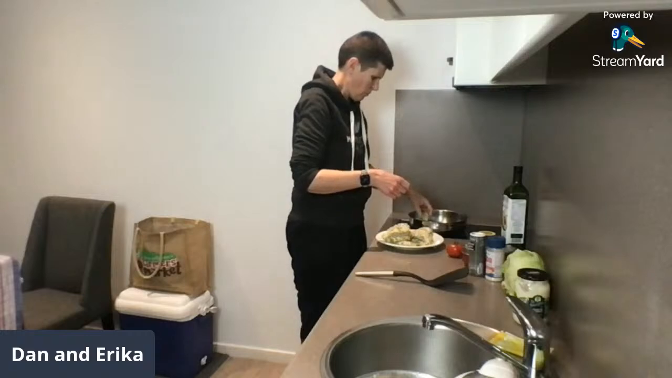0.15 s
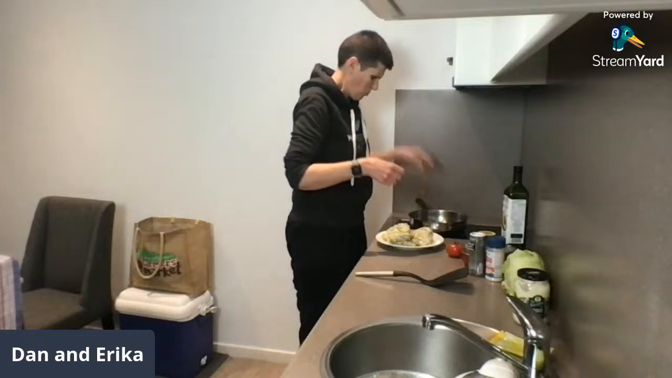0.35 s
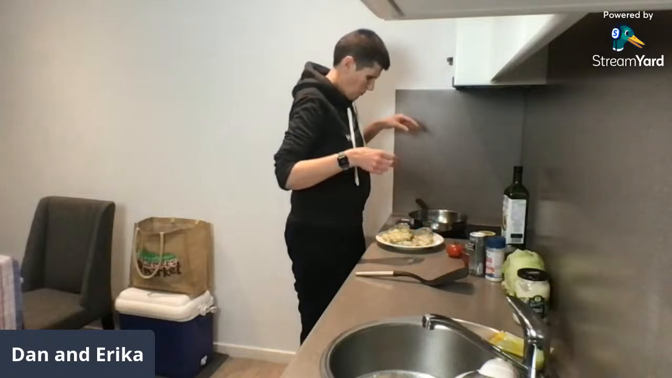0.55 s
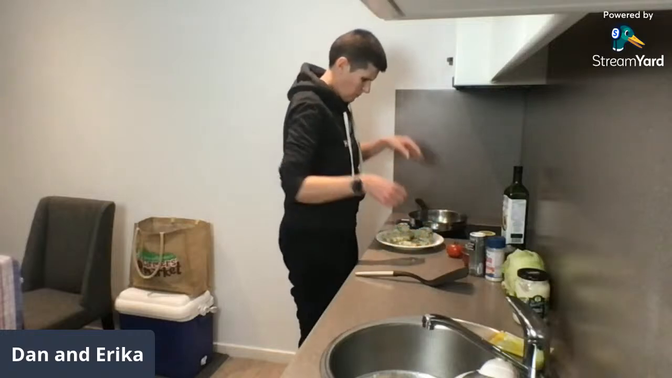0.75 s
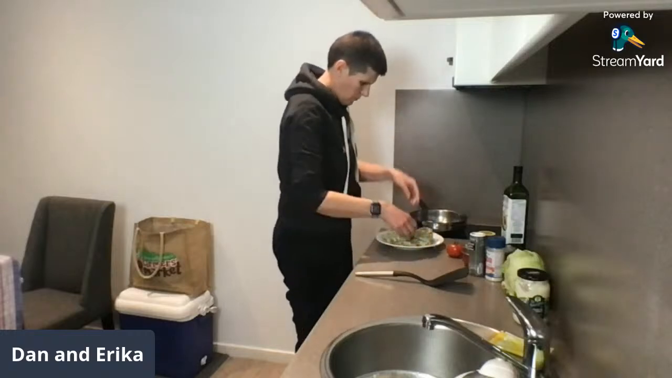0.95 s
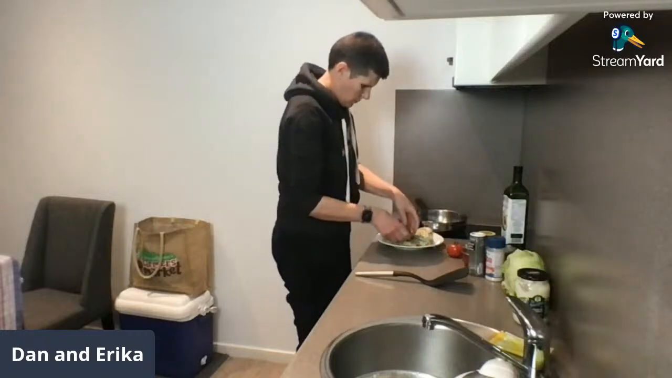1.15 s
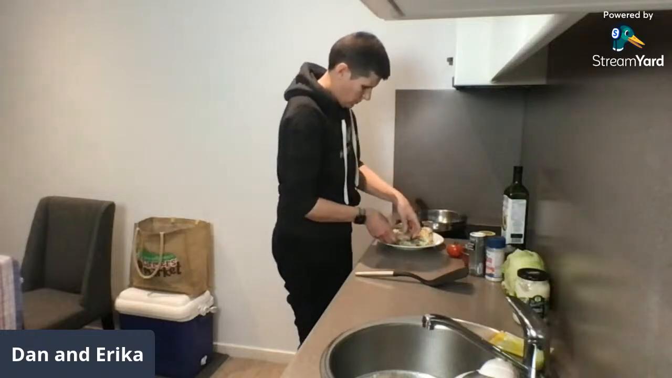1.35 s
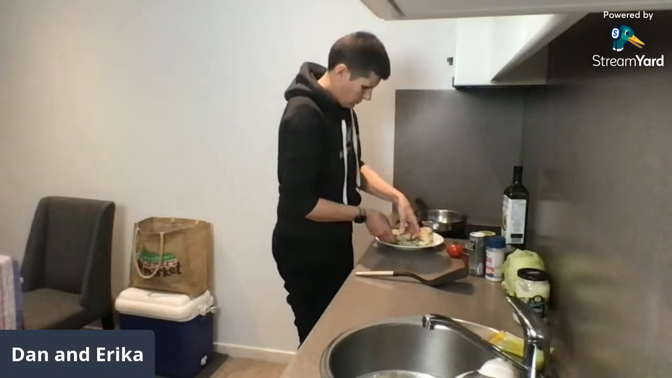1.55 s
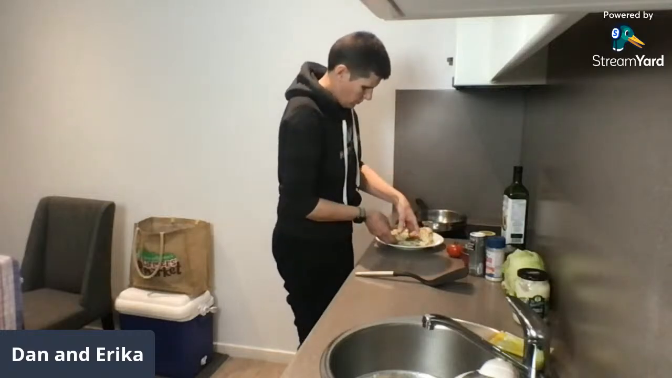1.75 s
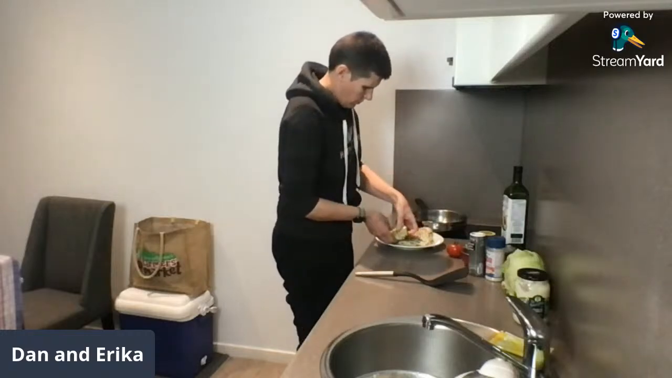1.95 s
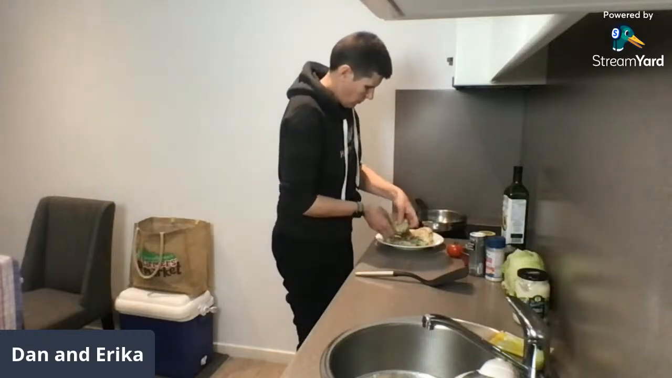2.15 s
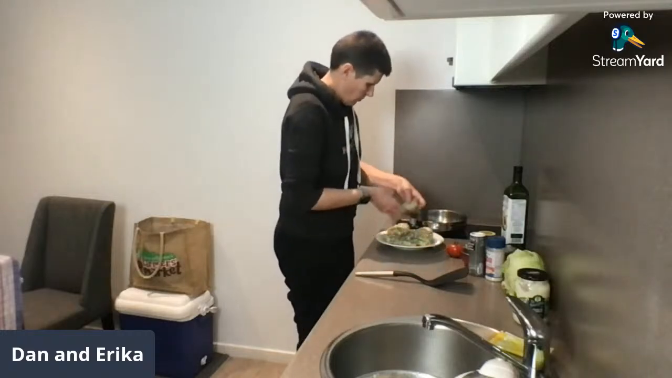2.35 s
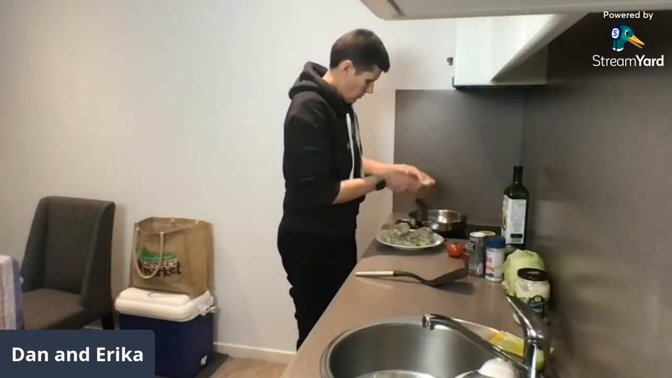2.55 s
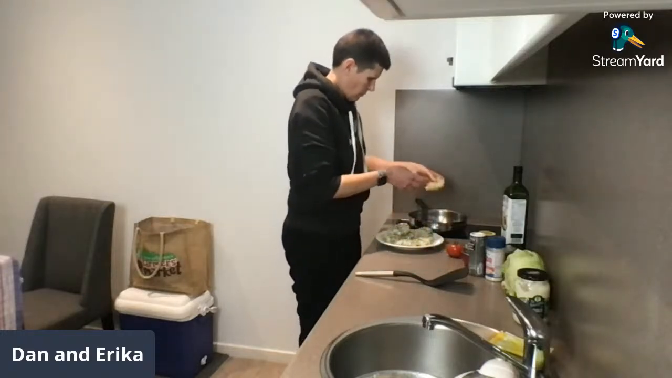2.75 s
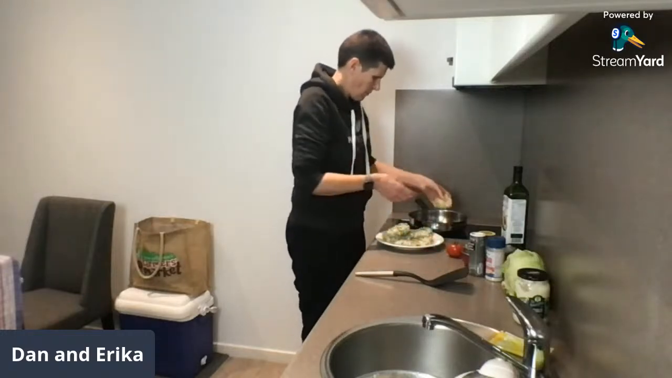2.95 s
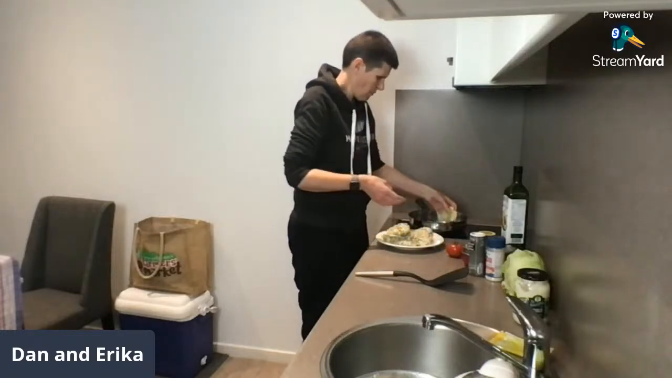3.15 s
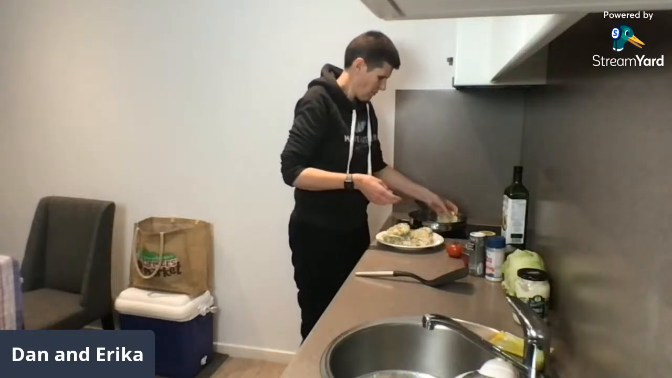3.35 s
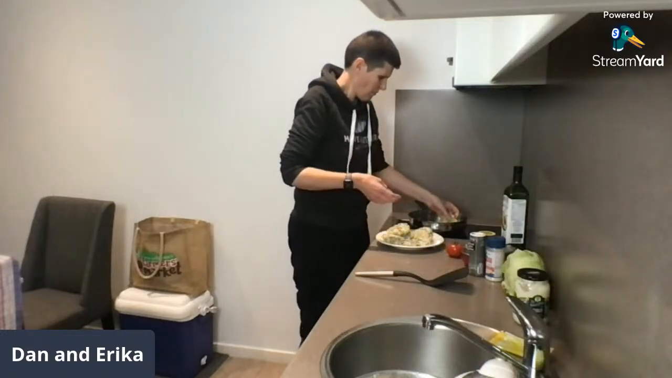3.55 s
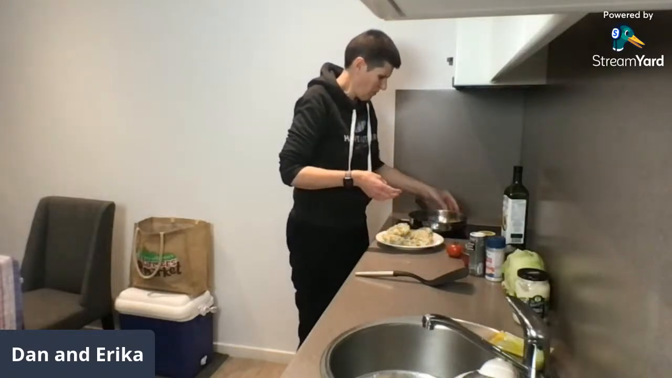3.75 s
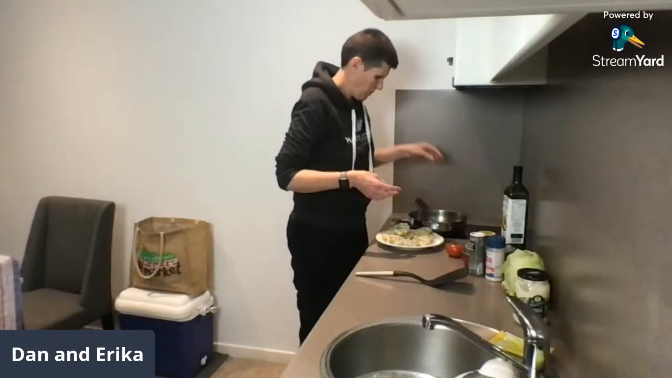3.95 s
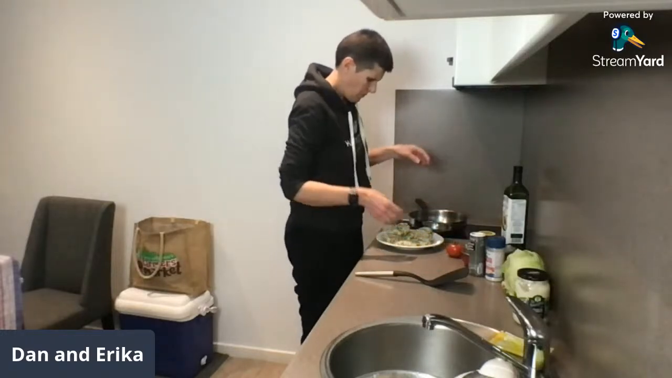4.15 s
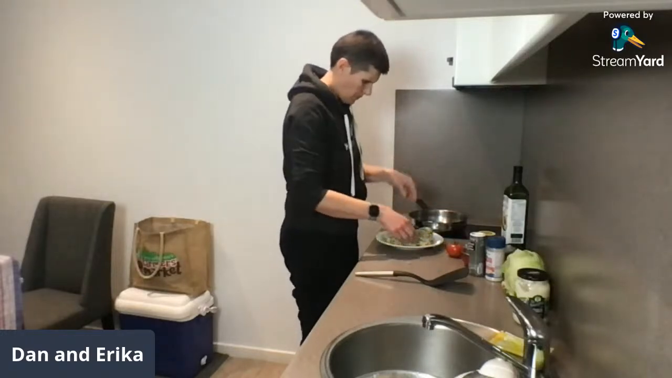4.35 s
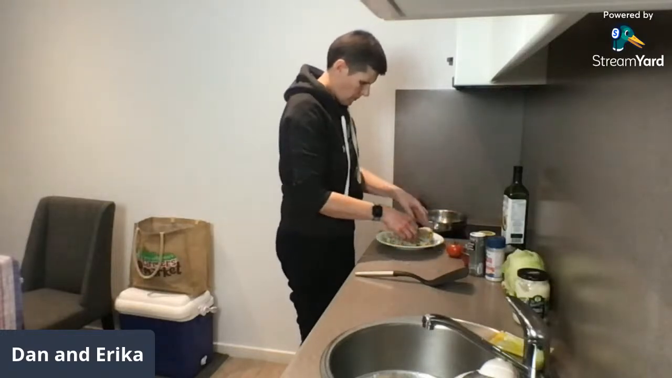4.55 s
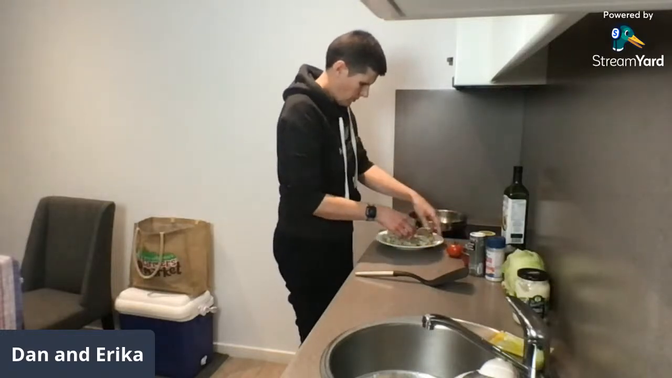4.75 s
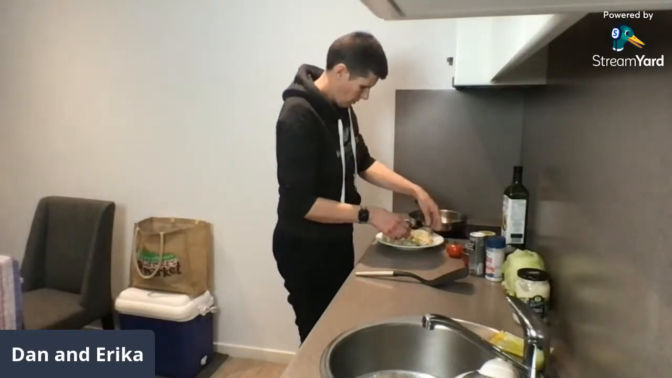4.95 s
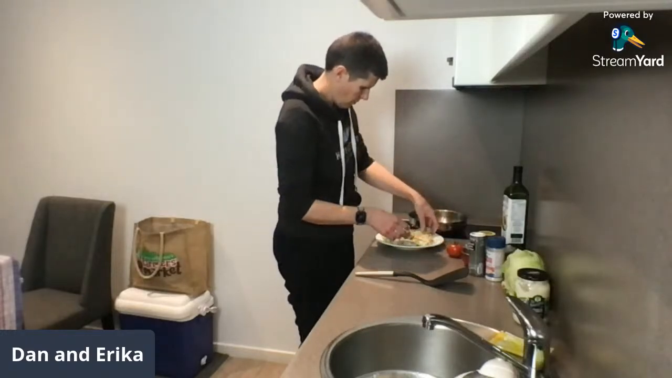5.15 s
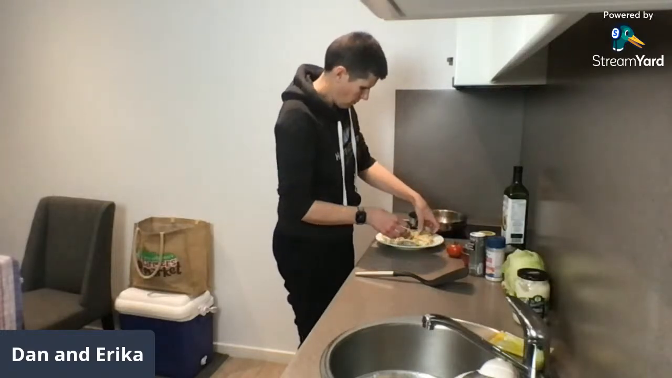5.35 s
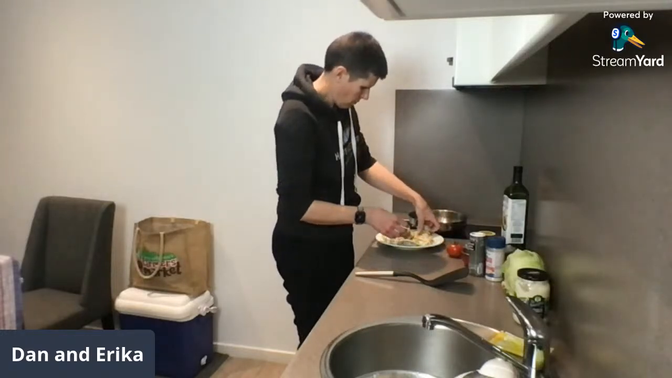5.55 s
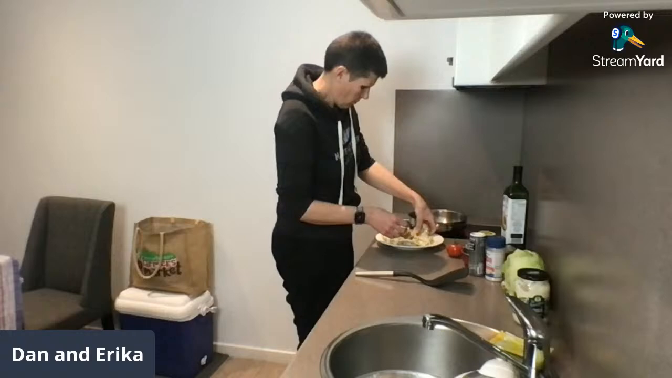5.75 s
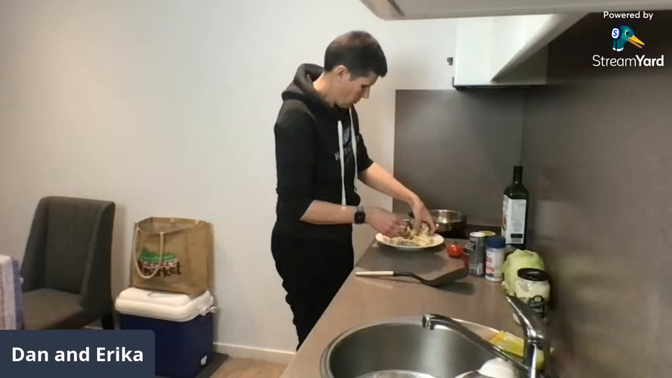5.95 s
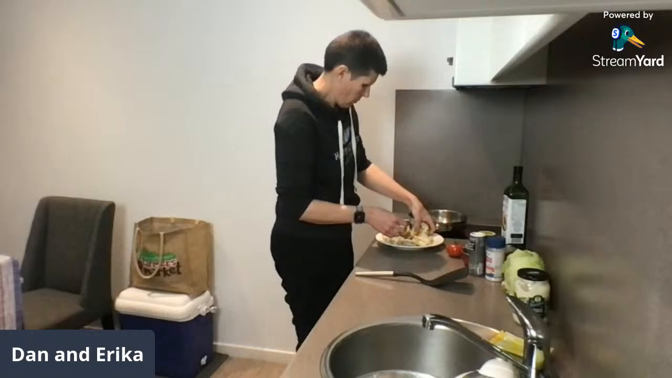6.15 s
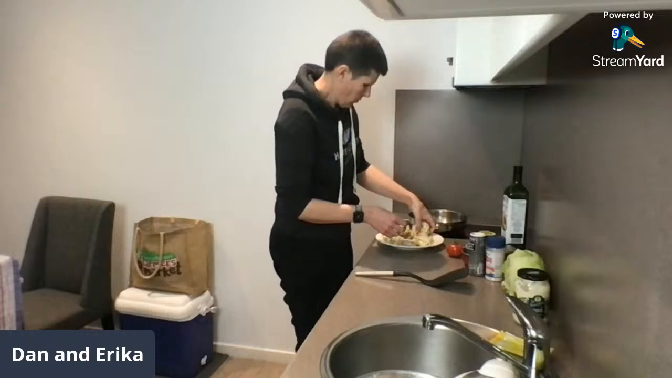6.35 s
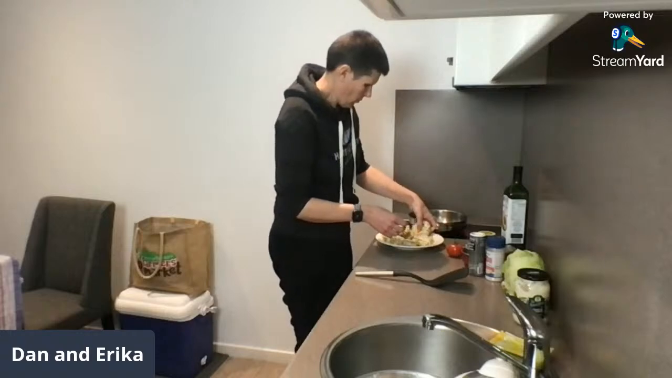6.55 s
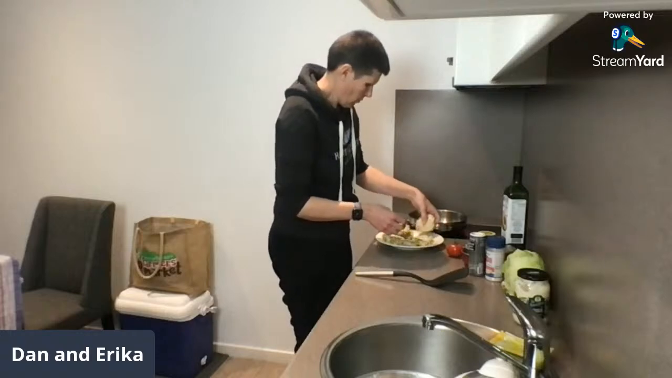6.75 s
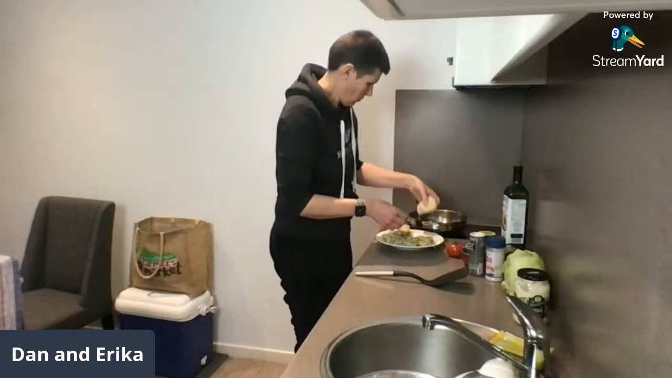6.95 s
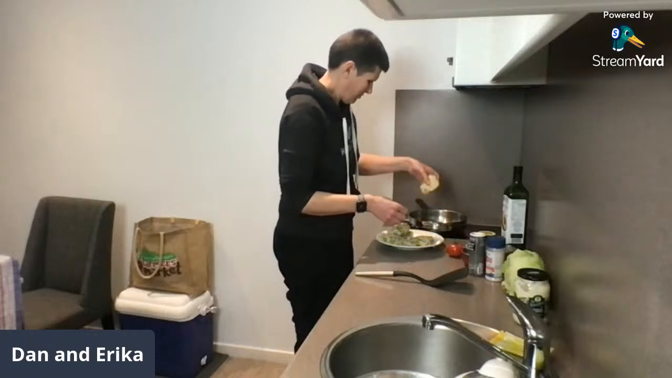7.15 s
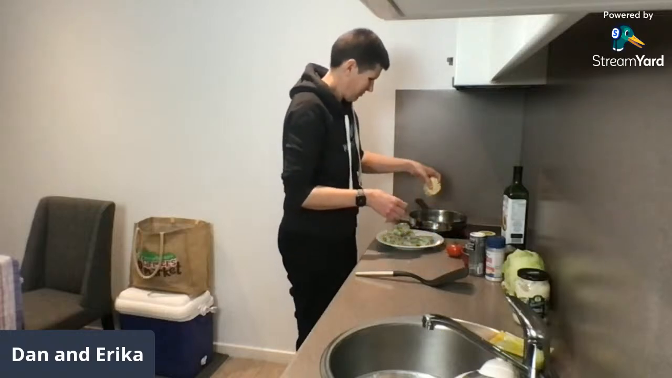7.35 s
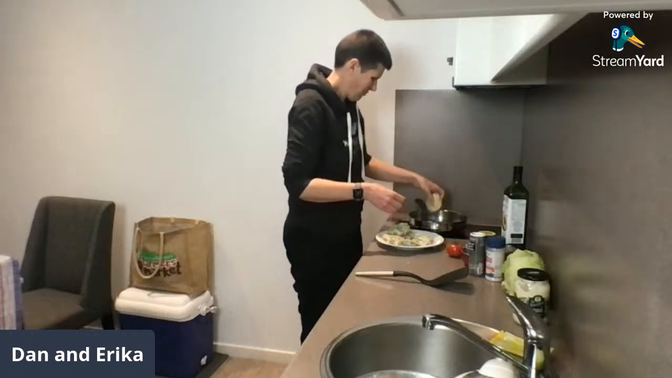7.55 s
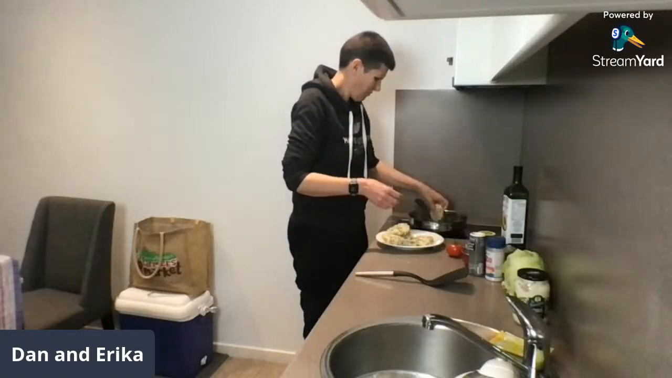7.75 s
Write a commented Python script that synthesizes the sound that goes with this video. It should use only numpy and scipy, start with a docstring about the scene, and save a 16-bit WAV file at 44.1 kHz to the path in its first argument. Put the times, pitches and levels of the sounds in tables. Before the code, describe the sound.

Meat patties sizzle and spit in hot oil in a small kitchen, with a sharp pan click and soft wet smacks.

```python
"""A small kitchen, where patties fry in hot oil a couple of metres away.
Countless steam bubbles burst in the oil and ring the hollow of the pan; larger ones spit a fine spray.
Two patties go in, one after the other: each sizzles up as its surface water boils off, then slowly
dries. The pan clicks twice, wet meat smacks softly as the next patty is shaped, and one spit pops
hard near the end. Under it all lie a low rumble and an appliance's hum."""
import sys
import numpy as np
from scipy import signal
from scipy.fft import rfft, irfft
from scipy.io import wavfile
from scipy.ndimage import uniform_filter1d

SR = 44100
rng = np.random.default_rng(int(sys.argv[2]) if len(sys.argv) > 2 else 0)


def generate_wav(sig):
    """Save sig (samples, or channels by samples) to the path in sys.argv[1] as 16-bit PCM at SR."""
    pcm = np.round(np.clip(np.atleast_2d(sig).T, -1, 1) * 32767).astype(np.int16)
    wavfile.write(sys.argv[1], SR, pcm)


N = 344862
TIME = np.arange(N) / SR

# patties going into the oil: first touch t/s, lying flat t/s, strength/dB
PATTIES = [(0.129, 0.428, 0), (3.671, 3.958, -0.7)]
DIP_S = 0.115  # how long a patty's edge takes to dip in


def undb(db):
    """Turn decibels into a number to multiply by."""
    return 10 ** (np.asarray(db) / 20)


def unit(x):
    """Scale a sound to an average (rms) level of 1."""
    return x / np.sqrt(np.mean(x ** 2) + 1e-18)


def burst_level(x, db):
    """Give a short sound the energy of 20 ms of steady sound at db."""
    return x * undb(db) * np.sqrt(.02 * SR / np.sum(x ** 2))


def add(out, s, x):
    """Mix x into out, starting at s seconds."""
    i = int(s * SR)
    out[i:i + len(x)] += x[:N - i]


def ramp(start, length):
    """Rise from 0 to 1 over length seconds."""
    return np.clip((TIME - start) / length, 0, 1)


def fade(t, t60):
    """Die away by 60 dB in t60 seconds, the fade time."""
    return np.exp(-np.log(1000) * t / t60)


def walk(rate):
    """Wander smoothly at random, about rate steps a second, with a typical size of 1."""
    k = int(SR / rate)
    steps = np.repeat(rng.standard_normal(N // k + 1), k)
    return unit(uniform_filter1d(steps, k)[:N])


def colour(x, points, size=4096):
    """Make some pitches louder and others softer, along a curve of (f/Hz, level/dB) points."""
    hz, db = np.transpose(points)
    f = np.maximum(np.arange(size // 2 + 1) * SR / size, 1)
    gain = undb(np.interp(np.log(f), np.log(hz), db))
    # build the filter so that nothing rings before the sound that starts it
    cepstrum = irfft(np.log(gain))
    cepstrum[1:size // 2] *= 2
    cepstrum[size // 2 + 1:] = 0
    response = irfft(np.exp(rfft(cepstrum)))
    return signal.fftconvolve(x, response)[:len(x)]


def resonate(x, hz, q):
    """Make a sound ring around one pitch; a higher q rings longer."""
    return signal.lfilter(*signal.iirpeak(hz, max(q, 1), fs=SR), x)


def ringing(t, tones):
    """Several pure tones that start together and fade, each at its own speed."""
    return sum(undb(db) * np.sin(2 * np.pi * (hz * t + rng.random())) * fade(t, t60)
               for hz, db, t60 in tones)


def splutter(t60, snap, lead, rise):
    """A cloud of tiny snaps swells for lead seconds, peaks with one sharp snap and dies away."""
    t = np.arange(SR // 5) / SR - lead
    swell = np.exp(np.minimum(t / rise, -t * np.log(1000) / t60))
    cloud = rng.laplace(size=len(t)) * swell
    cloud /= np.linalg.norm(cloud)
    cloud[int(lead * SR)] += snap
    return cloud


def kitchen(x, echo_db, t60):
    """The corner behind the stove and the walls add a short, duller wash of echoes."""
    t = np.arange(SR // 2) / SR
    wash = rng.standard_normal(len(t)) * fade(t, t60) * (t > .002)
    wash = colour(wash, [(300, 1.5), (4000, -9.0), (15000, -9.5)])
    return x + undb(echo_db) * signal.fftconvolve(x, wash / np.linalg.norm(wash))[:N]


def background():
    """The room rumbles unevenly and an appliance hums with the mains."""
    # tone of the kitchen's rumble: f/Hz, relative level/dB
    rumble_tone = [(25, -36), (45, -14), (65, -7.5), (85, 2), (110, -0.5), (140, -10), (185, -5), (250, -8),
                   (400, -14), (800, -30.5), (3000, -45), (15000, -55)]
    rumble_db, hum_db, hum_hz = -59, -68.5, 100
    rumble = unit(colour(rng.standard_normal(N), rumble_tone) * undb(2.8 * walk(14)))
    hum = unit(np.sin(2 * np.pi * hum_hz * TIME) * undb(2 * walk(6.6)))
    return undb(rumble_db) * rumble + undb(hum_db) * hum


def bumps():
    """Soft, low knocks swell for a moment and die away."""
    # knocks around the worktop: t/s, f/Hz, level/dB
    knocks = [(.43, 186, -50.5), (.525, 330, -51), (3.464, 183, -54), (3.628, 362, -59), (3.712, 188, -57),
              (4.001, 198, -56), (4.192, 350, -54), (6.15, 348, -52.5), (6.154, 170, -59),
              (6.235, 105, -49), (6.329, 105, -51), (6.596, 101, -52), (7.159, 238, -63)]
    out, t = np.zeros(N), np.arange(SR // 4) / SR
    for s, hz, db in knocks:
        thud = np.sin(2 * np.pi * hz * t) * (1 - np.exp(-t / 0.005)) * fade(t, t60=0.08)
        add(out, s, burst_level(thud, db))
    return out


def squelches():
    """Moist meat is pressed or peeled away with a soft, dull cluster of tiny smacks."""
    # patties slapped into the pan or shaped by hand: t/s, f/Hz, level/dB, fade time/s
    smacks = [(.42, 850, -32.5, 0.52), (2.299, 420, -44, .35), (3.726, 1400, -34.5, .3),
              (6.148, 900, -41.5, 0.1), (6.464, 795, -45, 0.17), (6.524, 1400, -40.5, 0.044),
              (6.61, 1100, -47, .06), (6.67, 2000, -37.5, 0.044), (6.703, 1900, -43, .05),
              (6.844, 1500, -38, 0.072), (6.922, 1680, -41, 0.059), (6.974, 1600, -47, .04),
              (7.145, 1700, -41.5, 0.059), (7.177, 2000, -40.5, .04)]
    out, lead = np.zeros(N), 0.012
    for s, hz, db, t60 in smacks:
        cloud = splutter(t60, snap=0.19, lead=lead, rise=0.0044)
        smack = colour(resonate(cloud, hz, q=0.8), [(80, -16), (250, -9.5), (3000, 0.5), (12000, 5)])
        add(out, s - lead, burst_level(smack, db))
    return out


def pan_clicks():
    """A hard contact cracks, then the loaded pan rings very briefly."""
    # clicks of the pan: t/s, relative level/dB
    clicks = [(3.2417, -21), (3.3237, -37.5)]
    # tones the pan rings with: f/Hz, relative level/dB, fade time/s
    pan_tones = [(342, -22.5, 0.086), (614, -14, 0.079), (692, -14, .06), (784, -14.5, 0.06),
                 (1740, -8, .04), (2040, 4, 0.025), (2300, 4, 0.024), (3190, 1, 0.031), (3700, -1, 0.017),
                 (4550, 3, 0.023), (5100, 4, 0.019)]
    # tone of the crack: f/Hz, relative level/dB
    crack_tone = [(120, -64), (250, -25), (380, -14), (520, -12), (700, -3), (1200, -14.5), (2000, 0),
                  (3700, -2), (5200, -10), (6200, -16), (9000, -18), (15000, -20)]
    out, t, lead = np.zeros(N), np.arange(SR // 5) / SR, .004
    for s, db in clicks:
        crack = colour(splutter(t60=0.055, snap=0.95, lead=lead, rise=.002), crack_tone)
        # the ring builds up as the blow spreads through the metal
        ring = ringing(t, pan_tones) * (1 - np.exp(-t / 0.0042))
        add(out, s - lead, burst_level(crack, db + 0.27))
        add(out, s, burst_level(ring, db - 4.5))
    return out


def plops():
    """A pocket of steam breaks out and rings at one pitch."""
    # large pockets escaping from under a patty: t/s, f/Hz, relative level/dB, fade time/s
    pockets = [(.412, 672, -28, 0.2), (.47, 632, -32, .16), (.606, 517, -35.5, 0.13),
               (0.657, 1830, -33, .1), (.778, 629, -37.5, .18), (1.161, 1803, -31, 0.036),
               (1.185, 618, -38, .14), (1.202, 1810, -32, .06), (1.275, 637, -36, 0.2),
               (1.417, 630, -42, 0.12), (1.705, 630, -45, .14), (1.936, 632, -42.5, .18),
               (2.208, 632, -44, 0.16), (2.695, 2440, -34.5, .03), (4.05, 640, -36.5, .14),
               (4.115, 620, -36, 0.19), (4.425, 640, -44, .1), (5.158, 630, -46, .12),
               (5.469, 640, -43.5, 0.23), (6.57, 635, -47, .14), (6.668, 1960, -40, .04)]
    out, t = np.zeros(N), np.arange(SR // 4) / SR
    for s, hz, db, t60 in pockets:
        ring = np.sin(2 * np.pi * hz * t) * fade(t, t60) * (1 - np.exp(-t / 0.0013))
        add(out, s, burst_level(ring, db - 5.0))
    return out


def jets():
    """A thin jet of steam hisses around one pitch, swelling and dying away."""
    # steam squeezing through narrow gaps under the meat: t/s, length/s, f/Hz, top level/dB
    squeals = [(0.143, 0.28, 2590, -36), (0.169, 0.5, 4130, -35.5), (0.194, 0.1, 9500, -34.5),
               (0.403, 0.13, 653, -36.5), (.58, .09, 515, -44), (3.727, 0.3, 2600, -40.5),
               (4.376, 0.38, 5200, -41.5), (5.845, 0.073, 2350, -39.5), (7.354, 0.1, 2260, -47)]
    out = np.zeros(N)
    for s, length, hz, db in squeals:
        noise = rng.standard_normal(int(length * SR))
        hiss = resonate(resonate(noise, hz, q=5.1), hz, q=5.1)
        swell = np.sin(np.linspace(0, np.pi, len(hiss)))
        add(out, s, undb(db) * unit(hiss) * swell)
    return out


def spurts():
    """Steam forces its way out through the oil in a brief, thin hiss."""
    # puffs of steam from under the meat, often in pairs: t/s, level/dB, fade time/s
    puffs = [(.552, -30, 0.033), (1.168, -36, .04), (1.204, -33.5, .04), (1.282, -29.5, .11),
             (1.316, -37, .05), (1.47, -35, .06), (1.516, -37.5, .06), (1.665, -34.5, 0.045),
             (1.679, -35, .06), (1.737, -38.5, .06), (1.935, -35, .08), (2.089, -31.5, 0.04),
             (2.1, -27.5, 0.066), (2.61, -39, .05), (2.79, -40, 0.079), (2.939, -39, .07),
             (4.968, -38, 0.036), (5.588, -40, .06), (5.866, -37, .05), (6.524, -40, .04),
             (7.142, -41, .04), (7.532, -40, 0.066)]
    # tone of a puff: f/Hz, relative level/dB
    puff_tone = [(1500, -31.5), (3400, -14.5), (4100, -2), (5300, 0), (6300, 1.5), (7200, -18),
                 (15000, -21)]
    out, lead = np.zeros(N), .004
    for s, db, t60 in puffs:
        cloud = splutter(t60, snap=.15, lead=lead, rise=.001)
        add(out, s - lead, burst_level(colour(cloud, puff_tone), db))
    return out


def hard_pop():
    """The hardest spit bursts with a bang that rings briefly at several uneven pitches."""
    # tones that ring with the bang: f/Hz, relative level/dB, fade time/s
    pop_tones = [(763, -16.5, 0.057), (1800, -6, .02), (2090, -4, 0.043), (2300, -6, 0.035),
                 (2800, -8, 0.038), (3450, -3, 0.032), (4350, -5, 0.028), (6100, 7, 0.024)]
    out, t = np.zeros(N), np.arange(SR // 5) / SR
    ring = ringing(t, pop_tones) * (1 - np.exp(-t / 0.00073))
    add(out, 7.32, burst_level(ring, db=-26))
    return out


def boiling():
    """Water from the meat boils: gives the boil's power and how far a patty is on its edge (0 to 1)."""
    # juice runs into the oil and the boil flares briefly: t/s, length/s, top level/dB
    flares = [(1.06, 0.35, -10), (2.458, 0.14, -10.5), (3.264, 0.12, -7), (3.36, 0.46, -16),
              (3.71, 0.22, -6), (4.17, 0.14, -10), (4.407, 0.26, -12.5), (5.388, 0.12, -8.5),
              (5.824, 0.088, -12.5), (6.48, 0.13, -13), (7.494, 0.3, -20)]
    edge_db, lay_s = -3, 0.067  # the edge alone boils less, until the whole face comes down
    flash_hold_s, flash_db_per_s = 0.1, 19  # surface water boils off fast
    juice_start_db, drying_db_per_s = -7, 1.16  # juice from inside keeps up a weaker boil
    juice_lasts_s, sealing_db_per_s = 2.48, 2.5  # then the crust seals and the boil falls faster
    power, on_edge = np.zeros(N), np.zeros(N)
    for touch, flat, db in PATTIES:
        dipped, laid = ramp(touch, DIP_S), ramp(flat - lay_s, lay_s)
        contact = dipped * undb(db + edge_db * (1 - laid))
        age = np.maximum(TIME - flat - flash_hold_s, 0)
        sealed_s = np.maximum(age - juice_lasts_s, 0)
        flash = undb(-flash_db_per_s * age)
        juice = undb(juice_start_db - drying_db_per_s * age - sealing_db_per_s * sealed_s)
        power += contact ** 2 * (flash ** 2 + juice ** 2)
        on_edge += dipped * (1 - laid)
    for s, length, db in flares:
        power += (undb(db) * np.sin(np.pi * ramp(s, length))) ** 2
    return power, on_edge


def small_spits(per_second=4, t60=0.047):
    """Rows for spits(), drawn at random once a patty lies flat; they weaken as the boil dies."""
    power, _ = boiling()
    first = PATTIES[0][1]
    count = int(per_second * (N / SR - first))
    times = first + (np.arange(count) + rng.random(count)) / per_second
    pitch_scatter, burst_scatter, spray_scatter = rng.standard_normal((count, 3)).T
    boil_db = 10 * np.log10(np.interp(times, TIME, power))
    hz = 5330 * 2 ** (0.21 * pitch_scatter)
    burst_db = -35.5 + 0.5 * boil_db + 0.9 * burst_scatter
    spray_db = -38 + 0.5 * boil_db + 0.9 * spray_scatter
    return list(zip(times, hz, burst_db, spray_db, np.full(count, t60)))


def spits():
    """A trapped drop of water bursts: the hole it leaves rings briefly and a fine spray hisses."""
    # big spits of oil: t/s, bubble f/Hz, relative burst level/dB, relative spray level/dB, fade time/s
    big_spits = [(0.4328, 4240, -27, -45, 0.1), (0.5263, 4960, -28, -32, 0.15),
                 (0.8049, 3750, -31.5, -32, 0.17), (1.015, 6000, -47, -38, .03),
                 (1.1192, 5400, -30, -34.5, 0.06), (1.193, 4000, -35, -35, 0.06),
                 (1.36, 4530, -36, -34, .08), (1.844, 5430, -42, -39.5, 0.054),
                 (1.993, 6000, -44, -39, .03), (2.1893, 5600, -26, -29, 0.13),
                 (2.449, 6270, -33.5, -37, 0.13), (2.515, 6000, -46, -36, .035),
                 (2.538, 3920, -35.5, -39, 0.029), (2.882, 5510, -36, -36.5, 0.13),
                 (3.073, 5790, -43, -38, .03), (3.0855, 5790, -43, -36.5, 0.025),
                 (3.3246, 4200, -35.5, -35, 0.037), (3.408, 4800, -37.5, -40, .06),
                 (3.657, 4000, -34, -37, 0.088), (3.768, 5000, -40, -35, .03),
                 (4.059, 2320, -33.5, -35, 0.033), (4.423, 6000, -34, -35, .025),
                 (4.439, 2630, -28, -40, .05), (4.488, 5590, -35, -45, .04), (4.652, 2740, -33, -36, 0.07),
                 (4.699, 6000, -32.5, -41, 0.13), (4.709, 2200, -35.5, -45, .05),
                 (4.753, 1990, -37.5, -45, .04), (4.995, 3180, -37, -40, .04),
                 (5.1583, 5390, -34.5, -31.5, 0.044), (5.275, 5560, -31.5, -34, 0.079),
                 (5.326, 6640, -43, -33.5, 0.1), (5.413, 4500, -30, -32, 0.091),
                 (5.453, 6040, -35, -40, .06), (5.4688, 2600, -26.5, -50, 0.071),
                 (5.537, 5550, -33, -34, 0.13), (6.061, 4500, -40, -49, 0.023),
                 (6.092, 4350, -33.5, -32, 0.12), (6.118, 4770, -37, -41, .03),
                 (6.204, 4760, -30.5, -30.5, 0.2), (6.2406, 4950, -38, -30.5, 0.057),
                 (6.5663, 4800, -33.5, -35.5, 0.11), (6.6076, 5700, -32.5, -31, 0.062),
                 (6.747, 5000, -36, -35, 0.08), (6.8147, 5300, -36, -29.5, 0.036),
                 (6.918, 4500, -37.5, -39, 0.089), (7.006, 5520, -40, -35, 0.12),
                 (7.081, 6600, -36, -39, 0.059), (7.225, 5030, -40, -31, 0.056),
                 (7.322, 4740, -25.5, -27.5, 0.071), (7.5958, 4630, -33.5, -33.5, 0.12)]
    # tones of the burst and of the spray: f/Hz, relative level/dB
    burst_tone = [(200, -28), (700, 5), (1300, 1.5), (2000, 7), (3000, 2), (6400, 3), (7800, 0),
                  (15000, -21)]
    spray_tone = [(300, -48), (1000, -43), (5000, -8.5), (7800, -4), (8200, 3), (10500, 4.5),
                  (15500, -1.5)]
    out, lead = np.zeros(N), .006
    for s, hz, burst_db, spray_db, t60 in big_spits + small_spits():
        cloud = splutter(t60, snap=.3, lead=lead, rise=0.0018)
        droplets = splutter(t60, snap=.33, lead=lead, rise=0.0015)
        burst = colour(resonate(cloud, hz, q=2.3), burst_tone)
        spray = colour(droplets, spray_tone)
        add(out, s - lead, burst_level(burst, burst_db + 0.14) + burst_level(spray, spray_db + 1.0))
    return out


def bursts(rate, spread_db):
    """Bubbles burst at random, rate times a second: many tiny, a few large."""
    size = undb(spread_db * np.minimum(rng.exponential(size=N), 6))
    happens = rng.random(N) < rate / SR
    return unit(happens * size * rng.choice([-1, 1], N))


def flicker(x, depth_db, seconds, width_hz, size=512):
    """Bubbles come in clusters of like size, so each range of pitch swells and fades on its own."""
    hz, _, spectrum = signal.stft(x, nperseg=size)
    swells = rng.standard_normal(spectrum.shape)
    swells = uniform_filter1d(swells, max(int(width_hz * size / SR), 1), axis=0)
    swells = uniform_filter1d(swells, max(int(2 * seconds * SR / size), 1), axis=1)
    # the tiniest, highest bubbles are so many that they even out
    unevenness = 1 / (1 + (hz[:, None] / 11500) ** 4)
    gain = undb(depth_db * unevenness * unit(swells))
    return unit(signal.istft(spectrum * gain, nperseg=size)[1][:N])


def bubble_pings(rate, spread_db, cycles, low_hz, high_hz):
    """Single bubbles ring briefly, each at a pitch set by its size."""
    out, t = np.zeros(N), np.arange(SR // 40) / SR
    for when, smallness, strength in rng.random((int(rate * N / SR), 3)):
        hz = low_hz * (high_hz / low_hz) ** smallness
        gain = undb(-spread_db * np.log(1 - .98 * strength))
        add(out, when * N / SR, gain * np.sin(2 * np.pi * hz * t) * fade(t, cycles / hz))
    return unit(out)


def pan_hollow(swell_db):
    """The bubbling keeps the hollow of the pan ringing, more so as the burble swells."""
    # tones of the open pan: f/Hz, width/Hz, relative level/dB, share of the swell it follows,
    # change once the second patty is in/dB
    hollow_tones = [(632, 21, -56.5, 0.71, -1.5), (1358, 37, -59.5, 0.9, 4), (1740, 93, -56, 0.51, -2.5),
                    (2376, 57, -55.5, 0.33, 10)]
    stir = bursts(rate=500, spread_db=1.5)
    second_in = ramp(PATTIES[1][0], DIP_S)
    out = np.zeros(N)
    for hz, width, db, share, change_db in hollow_tones:
        level_db = db - 4.5 + share * swell_db + change_db * second_in + 3.9 * walk(14)
        out += undb(level_db) * unit(resonate(stir, hz, q=hz / width))
    return out


def sizzle():
    """Small bubbles fizz, larger ones crackle, trapped steam burbles; a harder boil packs them closer."""
    # tone of the small bubbles: f/Hz, relative level/dB
    fizz_tone = [(1500, -30.5), (2800, -14), (4000, -0.5), (6200, -0.5), (7200, -3.5), (7850, -9.5),
                 (8100, -1), (8600, -4), (9400, -1.5), (11000, -4.5), (12000, -2.5), (15500, -4.5)]
    # tone of the larger bubbles: f/Hz, relative level/dB
    crackle_tone = [(700, -38.5), (1100, -12.5), (1350, -9.5), (1550, -10), (1740, 3), (2100, -1.5),
                    (2380, -1), (2600, -4.5), (3300, -3.5), (5000, -11), (9000, -31)]
    # tone of the steam under the patties: f/Hz, relative level/dB
    burble_tone = [(200, -22), (420, -15.5), (500, -10), (570, -9), (632, 3), (720, -7.5), (785, 0.5),
                   (840, -2.5), (900, 2), (1020, -8), (1130, 1), (1400, -5.5), (2500, -21)]
    # how each kind follows the boil, in relative levels: boil/dB, fizz/dB, crackle/dB, burble/dB
    boil_levels = [(-15.5, -41, -57, -69), (-11.5, -37.5, -46.5, -59), (-10.5, -36.5, -43.5, -57),
                   (-8, -35, -39.5, -49.5), (0.5, -27, -32, -37)]
    power, on_edge = boiling()
    boil_db = 10 * np.log10(power + 1e-12)
    steps_db, *columns = np.transpose(boil_levels)
    fizz_db, crackle_db, burble_db = (np.interp(boil_db, steps_db, column) for column in columns)
    # a patty on its edge traps less steam, and the wet edge crackles harder
    burble_db -= 5 * on_edge
    crackle_db += 1.5 * on_edge
    density = undb(fizz_db - np.mean(fizz_db))
    fizz = colour(bursts(rate=11000 * density, spread_db=2.4), fizz_tone)
    fizz = flicker(fizz, depth_db=1.5, seconds=.025, width_hz=550)
    crackle = colour(bursts(rate=3500 * density, spread_db=3.0), crackle_tone)
    crackle = flicker(crackle, depth_db=2.1, seconds=.04, width_hz=300)
    burble = colour(bursts(rate=900 * density, spread_db=2.5), burble_tone)
    burble = flicker(burble, depth_db=2.5, seconds=.05, width_hz=200)
    # the larger bubbles come in fits
    crackle *= undb(0.7 * walk(20))
    burble *= undb(1.5 * walk(16))
    bursting = fizz * undb(fizz_db + 1) + crackle * undb(crackle_db - 1) + burble * undb(burble_db - 1.5)
    bursting /= np.sqrt(density)  # denser bursts share the same power
    hollow = pan_hollow(swell_db=burble_db - np.mean(burble_db))
    pings = bubble_pings(rate=400, spread_db=4, cycles=70, low_hz=3800, high_hz=11000)
    layers = bursting + hollow + pings * undb(fizz_db - 13)
    # steam escapes in little surges that all sizes share; they even out in a hard boil
    surge_db = (walk(36) + 0.5 * walk(11)) / np.sqrt(density)
    # the oil is silent until the first patty wets it
    return layers * undb(surge_db) * ramp(PATTIES[0][0], length=0.016)


def scene():
    """All sounds share the room; the sizzle, spread over the pan, blurs its echoes. Both channels match."""
    events = spits() + spurts() + hard_pop() + pan_clicks() + plops() + squelches() + bumps()
    events = kitchen(events, echo_db=-14, t60=.15)
    frying = kitchen(sizzle() + jets(), echo_db=-12, t60=0.052)
    mono = frying + events + background()
    return np.array([mono, mono])


def record(dry, top_hz=15680):
    """Keep the sound within full scale and steeply cut the treble above top_hz."""
    treble_cut = signal.ellip(14, .1, 100, top_hz, fs=SR, output="sos")
    return signal.sosfilt(treble_cut, np.clip(dry, -1, 1))


dry = scene()
out = record(dry)
generate_wav(out)
```